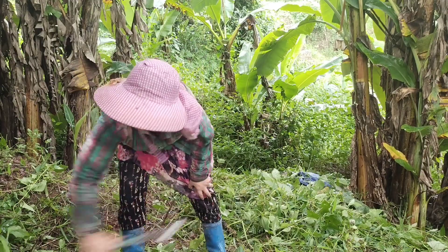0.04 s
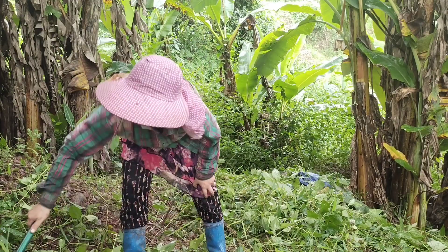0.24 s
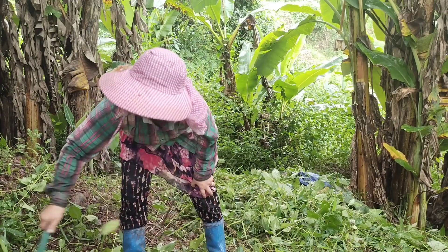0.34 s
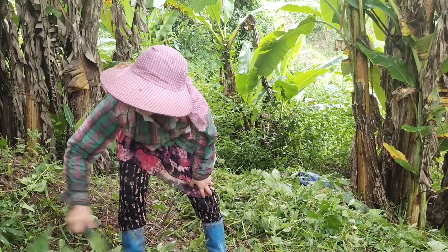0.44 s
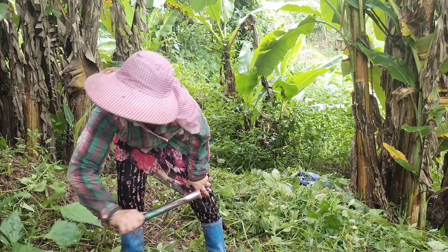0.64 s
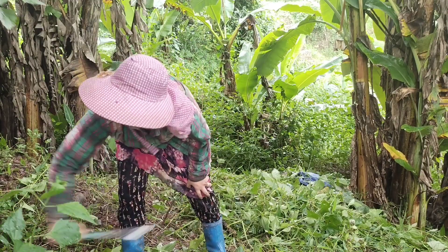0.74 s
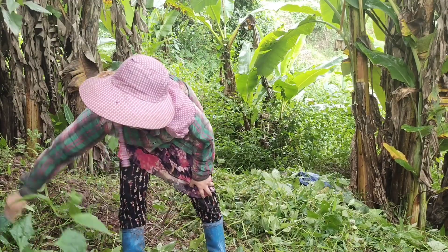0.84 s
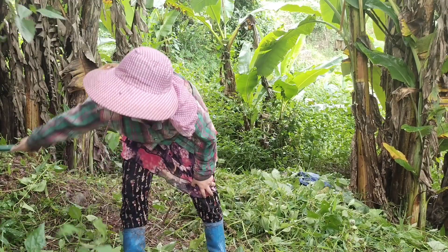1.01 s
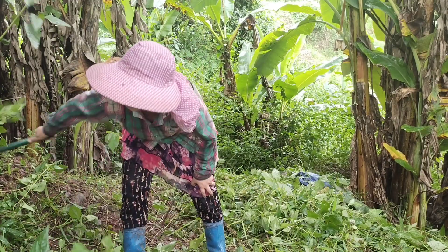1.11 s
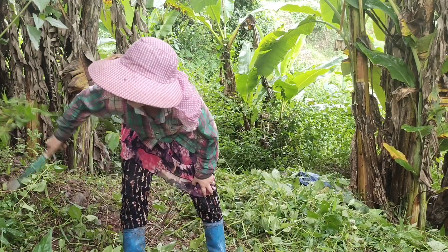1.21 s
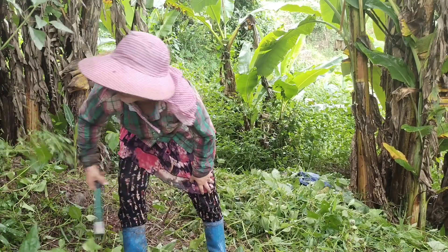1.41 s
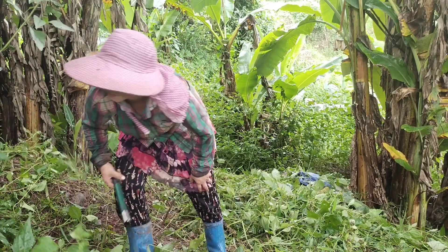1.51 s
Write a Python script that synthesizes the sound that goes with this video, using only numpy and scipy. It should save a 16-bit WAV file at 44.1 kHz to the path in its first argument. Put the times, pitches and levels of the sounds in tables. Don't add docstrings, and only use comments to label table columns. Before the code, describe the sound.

Two blade cuts in weeds: a sharp woody crack with steel ring, then a drier leafy sweep.

```python
import sys
import numpy as np
from scipy import signal
from scipy.fft import rfft, irfft, next_fast_len
from scipy.io import wavfile
from scipy.ndimage import uniform_filter1d, map_coordinates

SR = 44100
rng = np.random.default_rng(int(sys.argv[2]) if len(sys.argv) > 2 else 0)


def natural_amplitude(level_db):
    exponent = np.asarray(level_db, float) / 20
    return 10 ** exponent


def unload_audio(sound):
    columns = np.transpose(np.atleast_2d(sound))
    steps = np.round(np.clip(columns, -1, 1) * 32767)
    wavfile.write(sys.argv[1], SR, steps.astype(np.int16))


N = 68355


def unit(x):
    return x / np.sqrt(np.mean(x ** 2) + 1e-20)


def along(points, hz):
    f, v = np.transpose(points)
    return np.interp(np.log(hz + 1), np.log(f + 1), v)


def wobble(rate):
    return map_coordinates(rng.standard_normal(int(N * rate / SR) + 4), [np.arange(N) * rate / SR])


def filtered(x, response):
    m = next_fast_len(N + 8192)
    return irfft(rfft(x, m) * response(np.fft.rfftfreq(m, 1 / SR)), m)[..., :N]


def patchy(depth_db):
    z = signal.stft(rng.standard_normal(N + 512), nperseg=256)[2]
    field = uniform_filter1d(rng.standard_normal(z.shape), size=3, axis=0)
    field = uniform_filter1d(field, size=14, axis=1)
    return signal.istft(z * natural_amplitude(depth_db * unit(field)), nperseg=256)[1][:N]


# (frequency [Hz], density [dB per Hz])
BLOW_COLOUR = [(200, -27.5), (550, -15), (800, -7), (1100, -2), (2600, -11), (4500, -3.5), (8800, -1),
               (15500, -27.5)]
# (frequency [Hz], level [dB], t60 [s])
BLADE = [(1122, -9, 0.044), (1085, -29, 0.31), (1140, -26.5, 0.31), (1231, -31.5, 0.32),
         (267.5, -31, 0.044), (480, -29, 0.077), (2790, -32, .45), (3020, -38.5, 0.79), (6140, -43, 0.17),
         (6750, -24.5, 0.25), (6925, -25.5, 0.49), (7020, -32, .25), (7400, -27.5, 0.57)]


def blow():
    hit_s, rise_s = 0.2443, 0.00039
    t = np.maximum(np.arange(N) / SR - hit_s, 0)
    rise = 1 - np.exp(-t / rise_s)

    crack = unit(filtered(rng.standard_normal((3, N)), lambda hz: natural_amplitude(along(BLOW_COLOUR, hz))))
    crack = crack * natural_amplitude(-3.5 - 60 * t / 0.039)

    ring = np.zeros((3, N))
    for path in range(3):
        for hz, db, t60 in BLADE:
            level = natural_amplitude(db - 60 * t / t60 + 4.0 * wobble(57.8))
            shiver = 1.5 * wobble(60 + hz / 50)
            ring[path] += level * np.sin(2 * np.pi * hz * t + shiver)

    thud = natural_amplitude(-24.5 - 60 * t / 0.025) * np.sin(2 * np.pi * 139 * t)
    return rise * (crack + ring) + thud


# (time [s], peak level [dB], pitch [Hz], t60 [s], bandwidth over
SNAPS = [(.1930, -30, 8500, .004, 0.4), (.2010, -13, 2350, 0.0062, 0.64), (0.2116, -20, 1570, 0.0078, 1),
         (.2235, -21, 1160, .012, 1), (0.455, -28.5, 4850, 0.11, 0.31), (.4800, -43.5, 563, 0.26, 0.36),
         (0.577, -32, 10700, 0.014, 1), (.6550, -43.5, 412, 0.13, 0.29), (0.675, -41, 3500, 0.021, 0.49),
         (.9140, -25, 7900, 0.014, 0.61), (0.979, -36, 5060, .002, 1), (1.0452, -18, 3940, 0.0064, 1),
         (1.0500, -20, 6500, .005, .8), (1.1030, -29, 5370, .012, 0.94), (1.1647, -23.5, 6000, 0.014, 0.5),
         (1.351, -37, 1260, 0.2, 0.28), (1.4500, -43, 785, 0.18, 0.33), (.9400, -18.5, 4360, 0.089, 0.55),
         (1.353, -35, 3440, 0.064, 0.44)]


def snaps():
    out = np.zeros((3, N + SR))
    t = np.arange(SR // 8) / SR
    for s, db, hz, t60, width in SNAPS:
        burst = rng.standard_normal((3, len(t))) * natural_amplitude(-60 * t / max(t60, .001))
        burst[:, 0] = 2.7
        for twice in range(2):
            burst = signal.lfilter(*signal.iirpeak(hz, 1 / np.clip(width, .1, 1.2), SR), burst)
        peak = abs(burst).max(axis=1, keepdims=True)
        out[:, round(s * SR):][:, :len(t)] += natural_amplitude(db) * burst / peak
    return out[:, :N]


def leaves(rows, colour, flutter_db):
    s, db, body_db, bright_db = np.transpose(rows)
    t = np.arange(N) / SR
    tears_per_s, spread_db, largest_db = 300, 14, 1
    tears = (rng.random(N) < tears_per_s / SR) * natural_amplitude(largest_db - spread_db * rng.random(N))
    rough = 1 + signal.lfilter([1], [1, -np.exp(-1 / (0.0004 * SR))], tears)

    hiss = rough * np.array([patchy(depth_db=3.2) for path in range(3)])
    sound = unit(filtered(hiss, lambda hz: natural_amplitude(along(colour, hz))))
    treble = filtered(sound, lambda hz: 1 / (1 + (8000 / (hz + 1)) ** 4))
    body = filtered(sound, lambda hz: 1 / (1 + (hz / 2400) ** 12))
    sound = sound + treble * (natural_amplitude(np.interp(t, s, bright_db)) - 1)
    sound = sound + body * (natural_amplitude(np.interp(t, s, body_db)) - 1)

    flutter = flutter_db * wobble(20.98) + 0.93 * wobble(140)
    return sound * natural_amplitude(np.interp(t, s, db, -120, -120) + flutter)


# (time [s], level [dB], body [dB], brightening [dB])
CHOP = [
    (0, -61, 0.5, -1),
    (.175, -52, 8, -4),
    (.205, -37, 9.5, -1),
    (.222, -28.5, 9.5, 6.5),
    (.243, -26.5, 4, 2.5),
    (.278, -25, 3.5, 11.5),
    (.39, -38.5, -15.5, -8),
    (.47, -40.5, 2, 4.5),
    (.72, -60, 2.5, -4),
]
# (frequency [Hz], density [dB per Hz])
CHOP_COLOUR = [(150, -18.5), (500, -15), (1100, -3), (2000, -0.5), (5000, 0.5), (7000, -0.5), (10000, -5),
               (15500, -23)]
# (frequency [Hz], left over right [dB])
CHOP_SIDE = [(60, -4.5), (130, -4.5), (290, -6), (640, 2.5), (1410, 0.5), (3100, 0), (6820, 3),
             (15000, -5.5)]


def chop(stems):
    return ports(leaves(CHOP, CHOP_COLOUR, flutter_db=-0.6) + blow() + stems, CHOP_SIDE)


# (time [s], level [dB], body [dB], brightening [dB])
SWEEP = [
    (.885, -65.5, -4, 15),
    (.912, -60, -14, 26),
    (.916, -42.5, -5, 20.5),
    (.942, -29.5, 1, 14),
    (1.105, -33, -4.5, 8.5),
    (1.12, -34.5, -10.5, 8.5),
    (1.218, -36.5, -6, 6.5),
    (1.24, -42.5, -6, 4.5),
    (1.55, -58.5, -9, 20),
]
# (frequency [Hz], density [dB per Hz])
SWEEP_COLOUR = [(120, -29), (250, -7), (450, -4.5), (1200, -4), (3700, -0.5), (7100, -10), (10000, -18.5),
                (15500, -35)]
# (frequency [Hz], left over right [dB])
SWEEP_SIDE = [(60, -10), (130, 0.5), (290, -0.5), (640, -1), (1410, -0.5), (3100, 0), (6820, 2),
              (15000, -5.5)]


def sweep(stems):
    return ports(leaves(SWEEP, SWEEP_COLOUR, flutter_db=0.34) + stems, SWEEP_SIDE)


# (multiple of the firing rate [ratio], level [dB])
ENGINE = [(4, -68), (5, -57), (6, -56), (7, -64), (8, -69)]
# (time [s], level [dB])
ENGINE_LEVEL = [(0, -55.5), (.15, -55), (.27, -54), (.33, -68), (.43, -51), (.5, -60.5), (.63, -47),
                (.76, -54.5), (.88, -42.5), (.93, -58.5), (1.14, -53.5), (1.36, -55), (1.41, -49.5),
                (1.55, -54.5)]


def engine():
    t = np.arange(N) / SR
    firing_hz, gain_db = 24.54, 53.5
    swell_db = np.interp(t, *np.transpose(ENGINE_LEVEL))
    drone = np.zeros(N)
    for k, db in ENGINE:
        level = natural_amplitude(db + gain_db + swell_db + 1.9 * wobble(5.02))
        drone += level * np.sin(2 * np.pi * k * firing_hz * t + 0.89 * wobble(4.79))
    return drone


# (frequency [Hz], width [Hz], level [dB], left over right [dB])
INSECTS = [(7336, 230, -61, 8.5), (6700, 350, -70, 10), (2940, 350, -63.5, 2.5)]


def insects():
    song = np.zeros((2, N))
    for hz, width, db, pan_db in INSECTS:
        band = unit(filtered(rng.standard_normal((2, N)), lambda f: np.exp(-((f - hz) / width) ** 2)))
        pan = np.array([[pan_db], [-pan_db]]) / 2
        song += natural_amplitude(db + pan + 2.4 * wobble(70) + 2.5 * wobble(2)) * band
    return song


# (frequency [Hz], density [dB per Hz])
GARDEN = [(20, -53), (60, -15.5), (140, -7.5), (250, -14), (443, -12.5), (1680, -16), (5170, -34.5),
          (15500, -48)]
# (frequency [Hz], left-right correlation [ratio])
GARDEN_ALIKE = [(60, 0.89), (150, 0.74), (300, 0.98), (650, -0.16), (1400, -0.15), (3000, 0.13)]


def garden_air():
    turn = lambda hz: np.arccos(np.clip(along(GARDEN_ALIKE, hz), -1, 1)) / 2
    noise = np.array([patchy(depth_db=2.47), patchy(depth_db=-3.8)])
    mid, side = filtered(noise, lambda hz: natural_amplitude(along(GARDEN, hz)) * [np.cos(turn(hz)), np.sin(turn(hz))])
    return natural_amplitude(-52.5) * np.array([mid + side, mid - side]) / np.std(mid)


# (frequency [Hz], scattered share [ratio])
DIFFUSE = [(150, .1), (500, 0.2), (1500, 0.53), (4000, 0.79), (12000, 1)]


def ports(paths, balance):
    lag_s = 0.000254
    share = lambda hz: np.clip(along(DIFFUSE, hz), 0, 1)
    side = np.array([[1], [-1]])
    lag = lambda hz: np.exp(-1j * np.pi * hz * lag_s * side)
    direct = filtered(paths[0], lambda hz: np.sqrt(1 - share(hz)) * lag(hz))
    both = direct + filtered(paths[1:], lambda hz: np.sqrt(share(hz)))
    return filtered(both, lambda hz: natural_amplitude(side * along(balance, hz) / 2))


def scene():
    stems = snaps()
    late = np.arange(N) > .8 * SR
    return chop(stems * ~late) + sweep(stems * late) + garden_air() + engine() + insects()


def roll_off(x):
    return signal.sosfilt(signal.butter(12, 16330, fs=SR, output="sos"), x)


def record(dry):
    top, top_hz, rumble_hz = .98, 15150, 55
    squeezed = dry / (1 + abs(dry / top) ** 6) ** (1 / 6)
    treble_cut = lambda hz: 1 / (1 + (hz / top_hz) ** 200)
    bass_cut = lambda hz: 1 / (1 + (rumble_hz / (hz + 1)) ** 4)
    mix = filtered(squeezed, lambda hz: treble_cut(hz) * bass_cut(hz))
    return roll_off(mix)


dry = scene()
out = record(dry)
unload_audio(out)
```